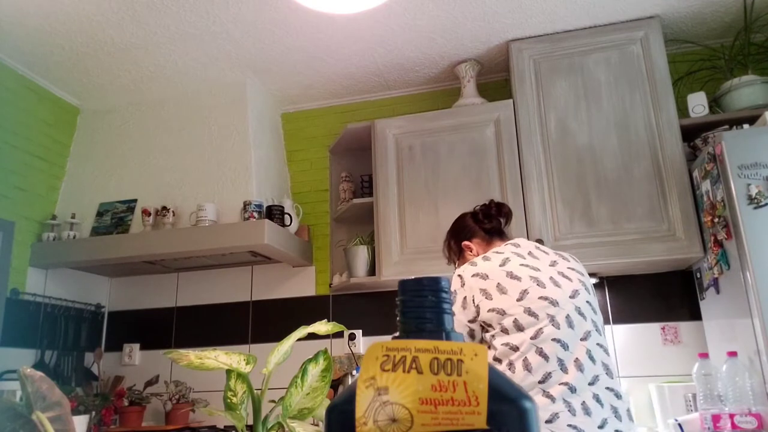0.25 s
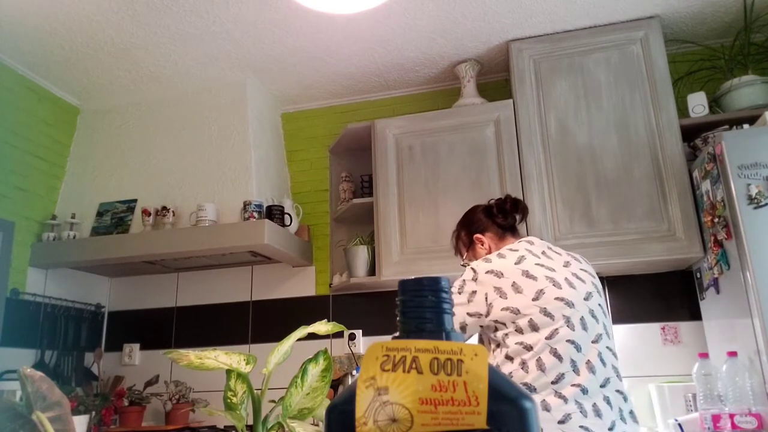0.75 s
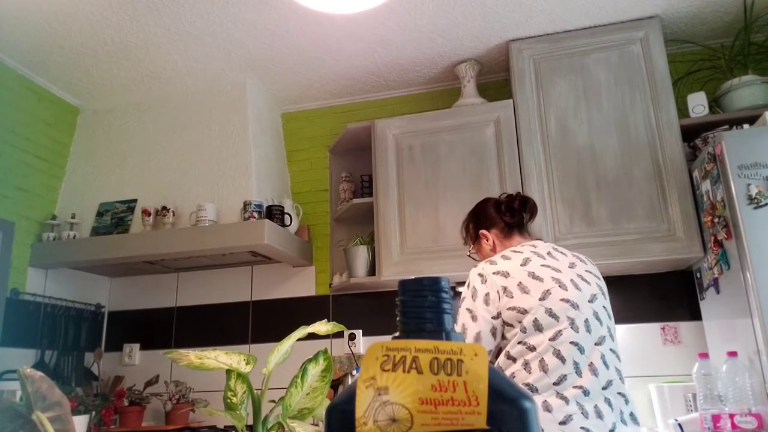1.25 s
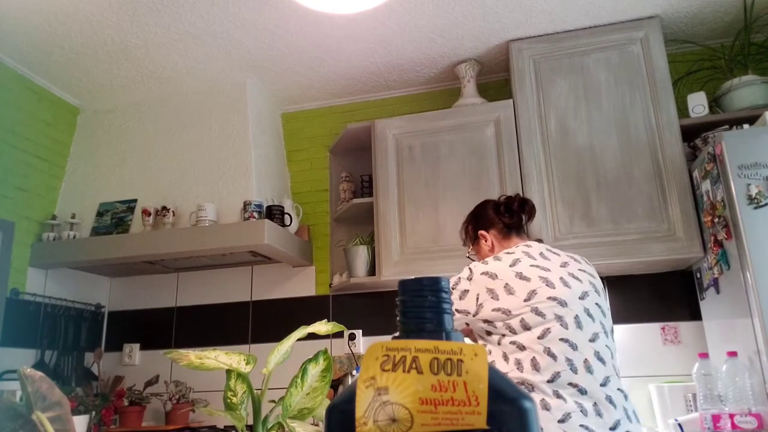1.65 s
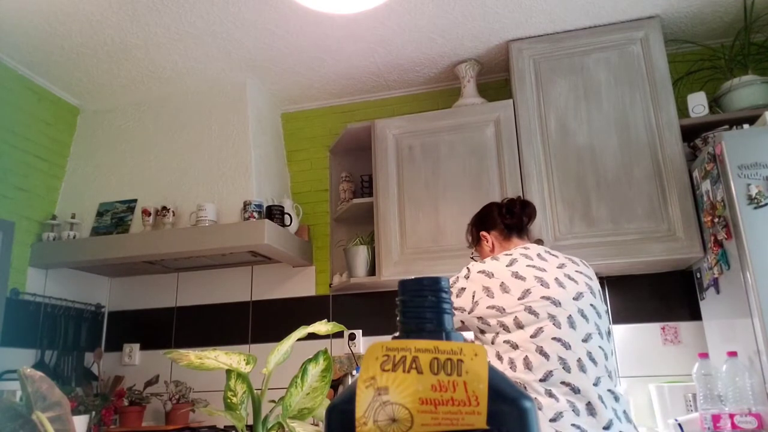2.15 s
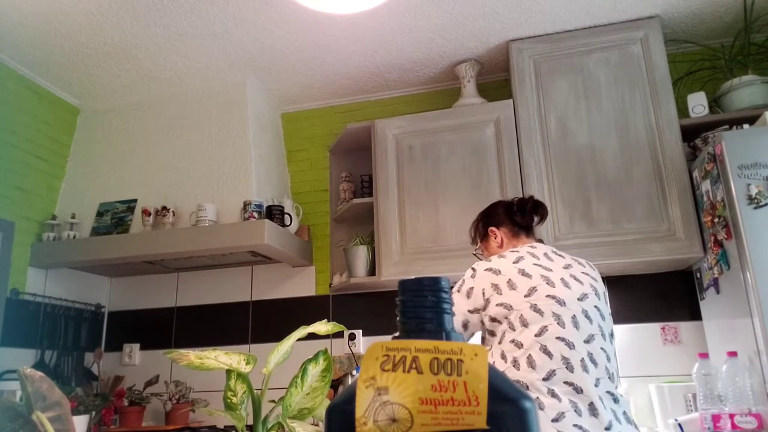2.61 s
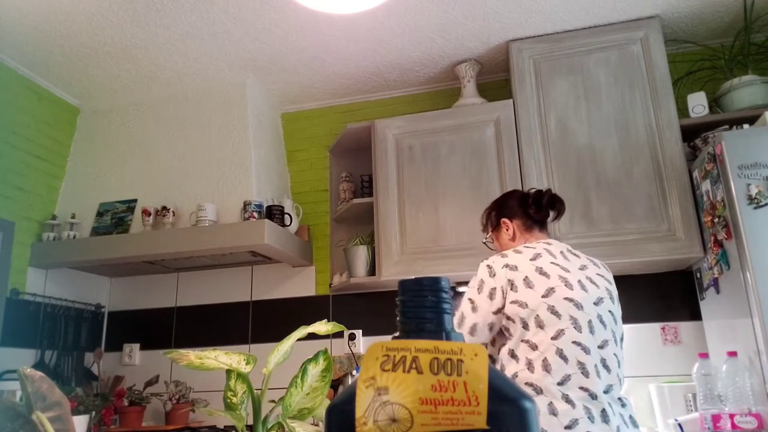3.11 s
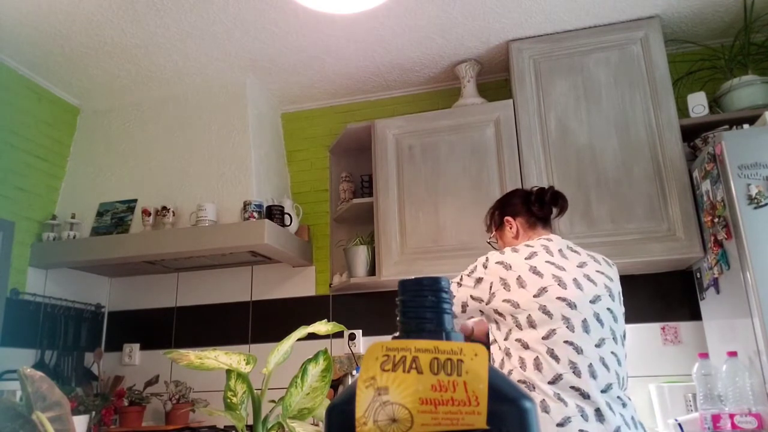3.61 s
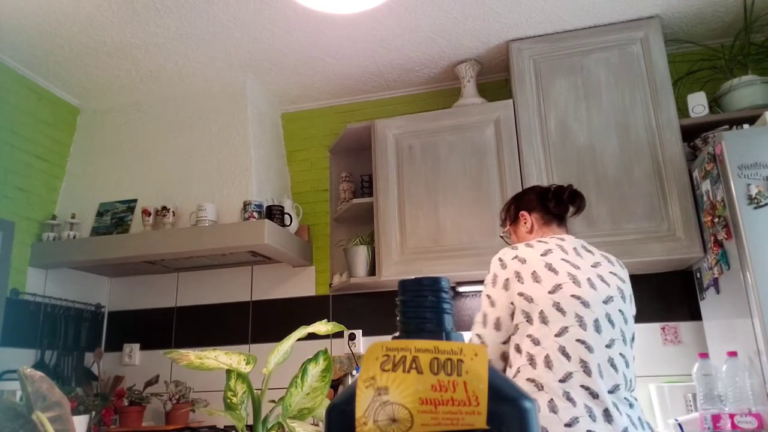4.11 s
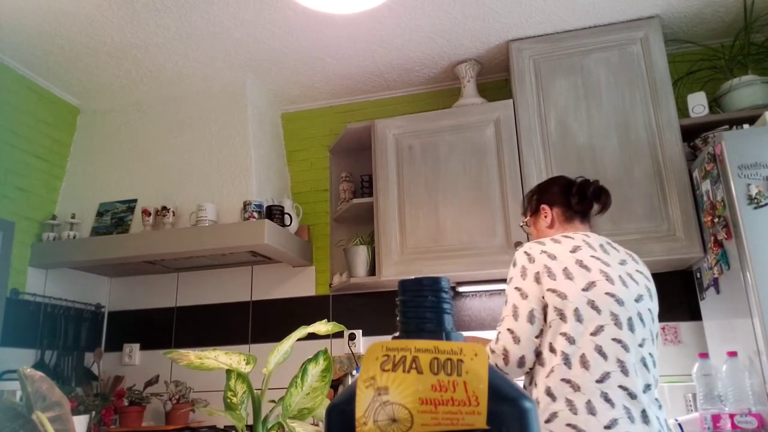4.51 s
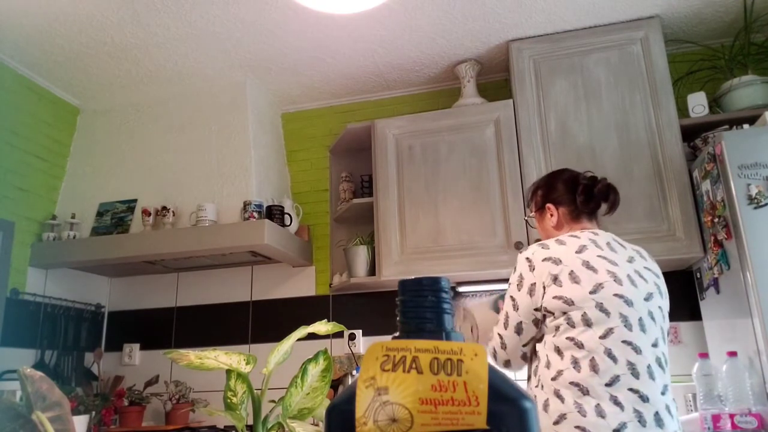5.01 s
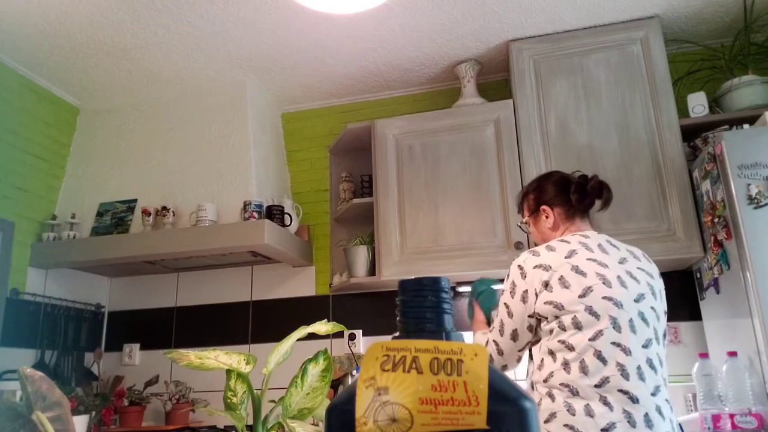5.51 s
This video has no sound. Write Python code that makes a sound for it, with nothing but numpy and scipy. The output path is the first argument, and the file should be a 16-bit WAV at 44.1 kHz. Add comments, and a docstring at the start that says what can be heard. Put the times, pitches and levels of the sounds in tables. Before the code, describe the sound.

Ceramic and plastic plant pots are slid, knocked and set down on a hollow kitchen counter, with clinks, plastic snaps and a faint appliance hum.

```python
"""Ceramic and plastic plant pots are handled on a kitchen counter, over steady room noise and an appliance's hum.
From the start a pot slides, as bursts of tiny clicks that excite grit, wall and counter, and knocks follow:
shaped noise bursts for the contact, decaying sines for the counter and hollow pots. Light clinks ring at 0.3,
0.8 and 3.4 s, plastic snaps from 2.3 s, and rims squeak from 2.5 s as narrow-band noise. The hardest blows
come near 4.1 s; quieter slides, two light knocks and a squeak end it. A short reverberation colours the noise."""
import sys
import numpy as np
from scipy import signal
from scipy.fft import rfft, irfft
from scipy.io import wavfile

SR = 44100
rng = np.random.default_rng(int(sys.argv[2]) if len(sys.argv) > 2 else 0)


def master(y):
    """Save y as 16-bit WAV."""
    cut = np.clip(np.atleast_2d(y).T, -1, 1)
    pcm = np.round(cut * 32767)  # scale
    wavfile.write(sys.argv[1], SR, pcm.astype(np.int16))


N = 253686

# Likeness of the sound at the two microphones. Each row: frequency in Hz, correlation.
COHERENCE = [(60, 0.99), (200, 0.94), (400, 0.51), (700, 0.49), (1300, 0), (15000, 0.00096)]
# Modes of the counter with its cupboard and the pots on it.
# Each row: frequency in Hz, relative level in dB, t60 in seconds.
COUNTER_MODES = [(65.9, 4.5, 0.41), (103.56, -5.5, 0.54), (127.4, 4.5, 0.34), (168.84, -7.5, 0.56),
                 (205.4, -10, 0.62), (263.1, -11.5, 0.23), (300, -14.5, 0.42), (499, -7, 0.21),
                 (546.7, -9, 0.44), (627.5, -4.5, 0.23), (693, -9.5, 0.23), (870, -26.5, 0.55),
                 (1021, -14.5, 0.42), (1432, -13.5, 0.27), (2750, -31, 0.12)]


def amp(db):
    """Decibels to gain: 20 dB is a factor of ten in amplitude."""
    return 10 ** (np.asarray(db) / 20)


def unit(x):
    """Normalises the effective (rms) value to 1."""
    return x / np.sqrt(np.mean(x ** 2) + 1e-20)


def read(points, hz):
    """Interpolates a table on a logarithmic frequency axis."""
    f, value = np.transpose(points)
    return np.interp(np.log(hz + 1), np.log(f + 1), value)


def add(mix, s, sound):
    """Superposition: adds a stereo sound from time s in seconds."""
    part = mix[:, max(round(s * SR), 0):][:, :sound.shape[1]]
    part += sound[:, :part.shape[1]]


def colour(x, gain):
    """Linear filtering: multiplies the spectrum by a gain that depends on frequency."""
    hz = np.fft.rfftfreq(x.shape[-1], 1 / SR)
    return irfft(rfft(x) * gain(hz), x.shape[-1])


def peak(f, hz, width):
    """Complex response of a damped resonance with the given half-power width in Hz."""
    return 1 / (1 + 2j * (f - hz) / width)


def decay(t, t60):
    """Exponential decay: the level falls by 60 dB in t60 seconds."""
    return np.exp(-np.log(1000) * t / t60)


def at_level(x, db):
    """Sets the rms level of the first 60 ms."""
    head = x[:, :round(0.06 * SR)]
    return x * amp(db) / np.sqrt(np.mean(head ** 2) + 1e-20)


def correlation(f):
    """Spatial coherence of the two microphones at a frequency."""
    return np.clip(read(COHERENCE, f), -1, 1)


def diffuse(size):
    """Diffuse field: noise whose coherence between the microphones is high only in the bass."""
    a, b = rng.standard_normal((2, size))
    mid = colour(a, lambda f: np.sqrt((1 + correlation(f)) / 2))
    side = colour(b, lambda f: np.sqrt((1 - correlation(f)) / 2))
    return np.array([mid + side, mid - side])


def kitchen(first_db=13, spread_s=0.022, count=9):
    """Room impulse response: a few early reflections in a diffuse tail that decays band by band."""
    # Reverberation time. Each row: frequency in Hz, t60 in seconds.
    reverberation = [(60, 0.21), (200, 0.41), (600, 0.36), (1500, 0.39), (4000, 0.39), (8000, 0.43),
                     (14000, 0.43)]
    tail = diffuse(size=32768)
    for channel in tail:
        at = (rng.random(count) * spread_s * SR).astype(int) + 40
        channel[at] += amp(first_db) * rng.uniform(-0.51, 0.89, count)
    hz, t, bands = signal.stft(tail, SR, nperseg=256)
    bands = bands * amp(-60 * t / read(reverberation, hz)[:, None])
    return signal.istft(bands, SR, nperseg=256)[1]


def room_air():
    """Stationary diffuse noise with a fixed spectrum: the steady noise of the room."""
    # Spectrum of the room noise. Each row: frequency in Hz, relative level in dB.
    air = [(15, -78), (25, -64), (44, -36), (102, 2.5), (129, -3.5), (210, -28), (290, -15), (401, -21.5),
           (459, -39), (585, -27), (688, -42.5), (877, -45.5), (3660, -41), (9400, -36), (15700, -44)]
    level_db = -51
    return amp(level_db) * unit(colour(diffuse(size=N), lambda f: amp(read(air, f))))


def appliance_hum():
    """Narrow-band noise: random drive through sharp resonances gives a hum that wavers."""
    # Hum bands. Each row: frequency in Hz, half-width in Hz at which the level is 6 dB down, level in dB.
    hum = [(93.1, 11, -52), (153.3, 6.7, -55.5), (201.8, 24.6, -56.5), (592.4, 18.6, -66.5), (672, 55, -67)]
    drive = diffuse(size=N)
    out = 0
    for hz, half_width, db in hum:
        out = out + amp(db) * unit(colour(drive, lambda f: peak(f, hz, 2 * half_width) ** 2))
    return out


def speed(t, swell, hold, fade):
    """Kinematics of one push: a smooth start, a steady glide, an exponential slowing down."""
    start = np.sin(np.pi / 2 * np.clip(t / swell, 0, 1)) ** 2
    return start * np.exp(-np.maximum(t - swell - hold, 0) / fade)


def slides(grains_per_s=900, grain_db=3.5, hiss_db=2, wall_db=0, rumble_db=-5, dull_hz=750, damping=1.5):
    """Friction as a random impulse train: grit catches under a pot and excites its wall and the counter."""
    # Spectrum of the gritty hiss. Each row: frequency in Hz, relative level in dB.
    grit = [(1180, -43), (2000, -1.5), (2420, -2.5), (2850, -1), (3750, 0), (4200, 0), (6740, 1),
            (9850, -5.5), (12400, -0.5), (15700, -18)]
    # Resonances of a sliding pot. Each row: frequency in Hz, half-power width in Hz, relative level in dB.
    pot_wall = [(546, 360, 5), (1047, 20, 9), (1480, 380, 4.5), (2340, 210, -13)]
    # A pot is pushed, gathers speed, glides and comes to rest. Each row: start, swell, hold and fade time
    # constant in seconds, then relative levels of gritty hiss, pot wall and counter rumble in dB.
    pushes = [(0.0, 0.0083, 0.13, 0.081, -49, -48.5, -32), (0.214, .05, 0.087, 0.23, -54, -70, -43),
              (0.345, 0.16, 0.036, .22, -49, -56.5, -50), (0.833, 0.096, 0.077, 0.16, -56.5, -61, -58),
              (2.357, .3, 0.13, 0.071, -47, -48.5, -43.5), (3.46, 0.088, 0.29, 0.11, -68, -77, -60),
              (3.723, 0.24, 0.2, .06, -49.5, -57, -47), (4.46, 0.075, 0.06, 0.035, -62.5, -72, -60),
              (4.986, 0.016, 0.09, 0.36, -63, -66, -73), (5.33, 0.18, 0.17, 0.066, -59, -63, -70),
              (5.535, .12, 0.018, 0.099, -50, -50, -52)]
    uneven_db, uneven_hz = 1.0, 26  # the pressure of the hand wavers: rms depth, bandwidth

    t = np.arange(N) / SR
    waver = unit(colour(rng.standard_normal(N), lambda f: np.exp(-(f / uneven_hz) ** 2)))
    pressure = amp(uneven_db * waver)
    sizes = rng.choice([-1, 1], N) * amp(grain_db * np.minimum(rng.exponential(1, N), 4))
    grains = pressure * sizes * (rng.random(N) < grains_per_s / SR)
    rub = signal.fftconvolve(grains[None], kitchen(), axes=1)[:, :N]

    def wall_gain(f):
        return np.sqrt(sum(abs(amp(db) * peak(f, hz, width)) ** 2 for hz, width, db in pot_wall))

    def rumble_gain(f):
        # a mode's width follows from its t60; the sliding pot damps it further
        modes = sum(amp(db) * peak(f, hz, damping * np.log(1000) / np.pi / t60)
                    for hz, db, t60 in COUNTER_MODES)
        return modes / (1 + (f / dull_hz) ** 4)

    hiss = amp(hiss_db) * unit(colour(rub, lambda f: amp(read(grit, f))))
    wall = amp(wall_db) * unit(colour(rub, wall_gain))
    rumble = amp(rumble_db) * unit(colour(rub, rumble_gain))
    power = 0  # overlapping pushes add in power
    for s, swell, hold, fade, *levels in pushes:
        power = power + (amp(levels)[:, None] * speed(t - s, swell, hold, fade)) ** 2
    return sum(sound * level for sound, level in zip([hiss, wall, rumble], np.sqrt(power)))


def squeak(length, db, hz, sharpness=40):
    """Stick-slip friction, as noise that keeps one narrow resonance of the pot going."""
    t = np.arange(0, length, 1 / SR)
    drive = rng.standard_normal(len(t)) * np.sin(np.pi * t / length)
    rub = signal.fftconvolve(drive[None], kitchen(), axes=1)
    ring = colour(rub, lambda f: peak(f, hz, 2 * hz / sharpness) ** 2)
    return amp(db) * ring / np.sqrt((ring ** 2).mean(0).sum() / len(t))


def clink(db, ring_hz, tick_db, rise_s=0.0035):
    """Light impact: a broad tick and the short modal ring of the pot wall."""
    # Ring of a touched pot. Each row: multiple of the ring pitch, half-power width in Hz, relative level in dB.
    modes = [(0.614, 70, -2), (.92, 170, -12), (1.0, 240, 0.5), (1.582, 350, -12), (2.215, 400, -12)]

    def gain(f):
        ring = sum(amp(level) * peak(f, ratio * ring_hz, width) for ratio, width, level in modes)
        tick = amp(tick_db) * abs(peak(f, 4700, 5100)) * f ** 2 / (f ** 2 + 1000 ** 2)
        return abs(ring) + tick

    answer = np.pad(kitchen(), ((0, 0), (0, 32768)))
    onset = 1 - np.exp(-np.arange(SR // 2) / SR / rise_s)
    return at_level(onset * colour(answer, gain)[:, :SR // 2], db)


def snap(db, dull):
    """Buckling of a thin plastic wall: a sharp broadband click heard through the room."""
    # Spectrum of a snap. Each row: frequency in Hz, relative level in dB if bright, the same if dull.
    plastic = [(101.3, 19, 11), (450, -2, 0), (1200, -7.5, 1), (2200, -7, 6.5), (3200, 0.5, -1.5),
               (5440, -9, 4), (8500, -2, -6), (12900, -1.5, -7), (15100, -10, -21)]
    rise_s, fade_db_per_s = 0.0077, 55  # a snap faces the microphone, so it is drier than a knock
    hz, bright_db, dull_db = np.transpose(plastic)
    spectrum = np.transpose([hz, bright_db + np.clip(dull, 0, 1) * (dull_db - bright_db)])
    click = colour(kitchen(), lambda f: amp(read(spectrum, f)) * f / (f + 60))
    t = np.arange(click.shape[1]) / SR
    return at_level(click * (1 - np.exp(-t / rise_s)) * amp(-fade_db_per_s * t), db)


def hollow(db, hz, t60, swell_s=0.019, lag_s=0.000079):
    """Cavity resonance: a pot and the air in it ring as one decaying low sine."""
    t = np.arange(SR) / SR
    wave = np.sin(2 * np.pi * hz * (t + np.array([[0], [lag_s]])))
    return amp(db) * wave * (1 - np.exp(-t / swell_s)) * decay(t, t60)


def counter(crack_db, boom_db, thud_db, body_db, top_db, ring_db=1, swell_s=0.043, detune=0.0039):
    """Modal synthesis: the counter's modes take up the blow; the low ones build over several cycles."""
    force = [(70, boom_db), (100, thud_db), (300, thud_db), (450, body_db), (800, body_db), (1400, crack_db)]
    t, out = np.arange(SR) / SR, 0
    for hz, db, t60 in COUNTER_MODES:
        # opposite phase shifts give the two channels their correlation
        phase = np.arccos(correlation(hz)) * rng.choice([-0.5, 0.5]) * np.array([[1], [-1]])
        mode_hz = hz * (1 + detune * rng.uniform(-0.74, 1))
        wave = np.sin(2 * np.pi * mode_hz * t + phase)
        build = 1 - np.exp(-(t / (swell_s * np.sqrt(124 / hz))) ** 2)
        out = out + amp(db + ring_db + read(force, hz)) * wave * build * decay(t, t60)
    return out


def contact(crack_db, boom_db, thud_db, body_db, top_db, hard_rise_s=0.0026, give=0.51):
    """Impact through the room: boom rises fast, thud and body slower; a weaker crack takes longer to rise."""
    # Spectrum of a contact. Each row: frequency in Hz, relative level in dB.
    spectrum = [(40, -21), (65, 11), (200, 0.5), (370, -7), (480, 3.5), (700, -2.5), (1000, -10.5),
                (1220, -10), (1480, -4.5), (2000, -8.5), (2700, -7.5), (6000, -10), (10000, -23.5),
                (12500, -16.5), (15500, -35.5)]
    answer = colour(kitchen(), lambda f: amp(read(spectrum, f)))
    t, out = np.arange(answer.shape[1]) / SR, 0
    touch_s = hard_rise_s * amp(-give * crack_db)
    # Each row: band edges in Hz, level in dB, rise time constant in seconds.
    parts = [(56.3, 109, boom_db - 24.0, 0.0067), (88.0, 313, thud_db - 9.5, 0.067),
             (330, 1024, body_db - 10.0, 0.038), (1004, 9200, crack_db - 10.5, touch_s),
             (9460, 19300, top_db - 12, touch_s)]
    for low, high, db, rise_s in parts:
        band_pass = signal.butter(4, [low, high], "band", fs=SR, output="sos")
        band = signal.sosfilt(band_pass, answer)
        out = out + at_level(band * (1 - np.exp(-t / rise_s)) ** 0.98, db)
    return out * np.clip((t[-1] - t) * 10, 0, 1)  # fades out over the last 0.1 s


def knock(strength_db, hard_db, weight_db, body_db):
    """One blow excites both contact and counter; a harder crack also brings more top treble."""
    crack_db = strength_db + hard_db
    top_db = -22.5 + 0.64 * crack_db
    blow = crack_db, strength_db + weight_db, strength_db, strength_db + body_db, top_db
    return contact(*blow), counter(*blow)


def scene():
    """Superposition of all the handling and the room's background."""
    # Light touches of pot on pot. Each row: start in seconds, level in dB, ring pitch in Hz, tick in dB.
    clinks = [(0.297, -49.5, 2530, -12), (0.78, -53.5, 2500, -24), (0.797, -42.5, 2360, -11),
              (3.385, -53.5, 2090, -10), (3.398, -55.5, 2570, -8)]
    # Low notes of pots set down. Each row: start in seconds, level in dB, frequency in Hz, t60 in seconds.
    hollows = [(0.087, -3, 125, 0.18), (2.223, -13.5, 127.3, 0.25), (2.858, -17, 129.4, 0.12),
               (2.858, -18.5, 201.2, 0.17), (3.873, -17, 464.4, 0.4), (4.125, -17, 271.4, 0.35),
               (4.27, -14, 132, 0.16), (4.912, -27, 186.4, 0.23), (5.349, -27, 280, 0.14),
               (5.355, -32.5, 393, 0.12)]
    # Thin plastic pots snap against each other.
    # Each row: start in seconds, level in dB, dullness from 0 (bright) to 1 (mid-range).
    snaps = [(2.29, -53, 0.61), (4.053, -30.5, 0.17), (4.219, -34, 0.63), (4.268, -39.5, .6)]
    # A glazed rim squeaks as it rubs. Each row: start and length in seconds, level in dB, frequency in Hz.
    squeaks = [(2.54, 0.29, -51.5, 1065), (3.54, 0.087, -67, 5500), (5.577, .14, -57.5, 1416)]
    # Pots knocked on the counter. Each row: start in seconds, relative strength in dB, then relative to the
    # strength: hard crack, deep boom and pot body in dB.
    knocks = [(0.041, -32, -24, -14, -5), (0.082, -16.5, -1.5, -8, -2), (0.425, -37, -19, -0.5, -5),
              (0.549, -41.5, -0.5, -17, -1), (0.948, -24, -7.5, -2.5, -3), (1.069, -40, -40, 3.5, 2),
              (1.528, -33.5, -14, -1.5, -9), (1.753, -40.5, -14, -7, -3), (1.993, -41.5, -20.5, 4.5, -9),
              (2.205, -24.5, -10, -6, -4.5), (2.843, -20, -3.5, -5, -2.5), (3.867, -18.5, -3.5, 1.5, -2),
              (4.119, -13.5, -0.5, 6.5, -1), (4.156, -25, -3, 6, 0), (4.263, -24, -6, -3, -4),
              (4.379, -28, -10.5, -7, -3.5), (4.909, -37, -8.5, -24, -4), (5.35, -37.5, -8, -22, -0.5)]

    mix = room_air() + appliance_hum() + slides()
    for table, source in [(squeaks, squeak), (clinks, clink), (snaps, snap), (hollows, hollow)]:
        for s, *settings in table:
            add(mix, s, source(*settings))
    for s, *settings in knocks:
        for sound in knock(*settings):
            add(mix, s, sound)
    return mix


def record(dry):
    """Microphone response: the two channels differ in colour, then a low-pass limits the band."""
    # Difference of the channels. Each row: frequency in Hz, left minus right in dB.
    balance = [(60, -0.5), (300, 3.5), (700, -3), (1300, -2), (4000, -1.5), (8000, -1), (12500, -6)]
    edge_hz = 15800
    heard = colour(dry, lambda f: amp(read(balance, f) * np.array([[0.5], [-0.5]])))
    low_pass = signal.firwin(511, edge_hz, window=("kaiser", 9), fs=SR)
    return signal.oaconvolve(heard, low_pass[None], "same")


dry = scene()
out = record(dry)
master(out)
```